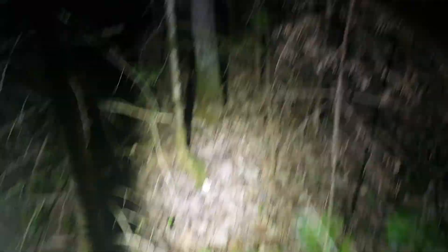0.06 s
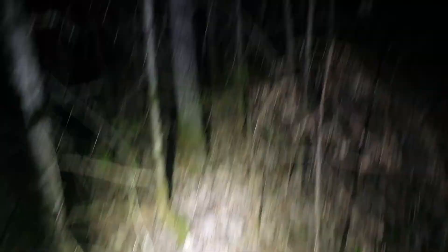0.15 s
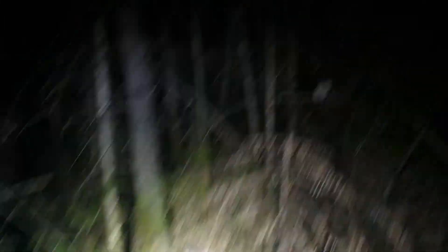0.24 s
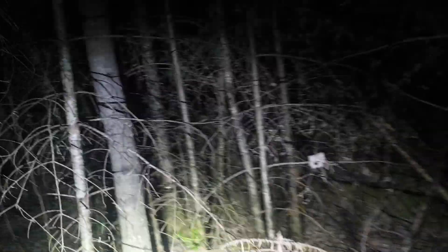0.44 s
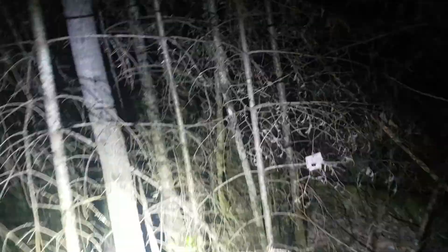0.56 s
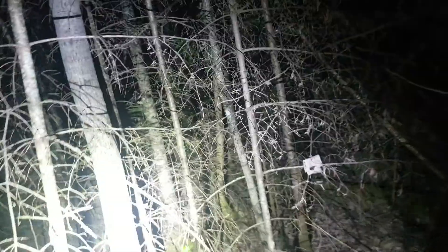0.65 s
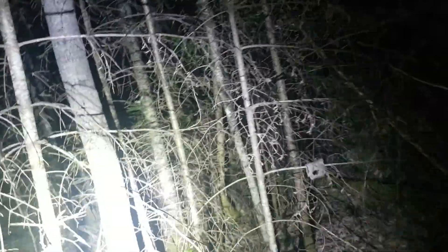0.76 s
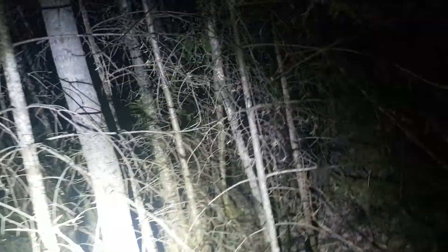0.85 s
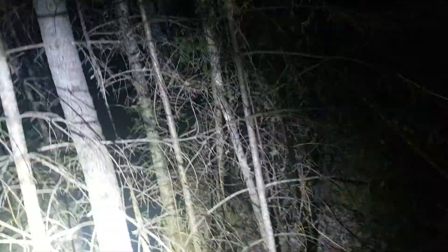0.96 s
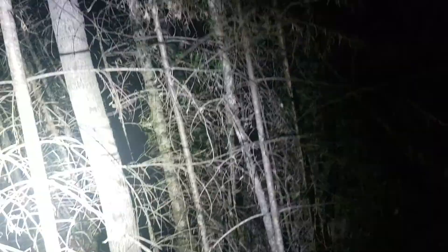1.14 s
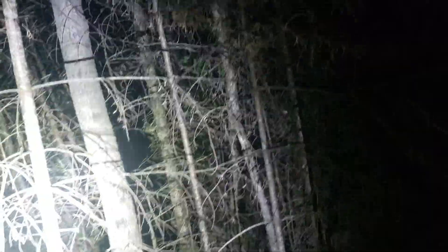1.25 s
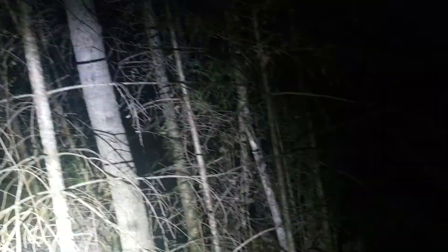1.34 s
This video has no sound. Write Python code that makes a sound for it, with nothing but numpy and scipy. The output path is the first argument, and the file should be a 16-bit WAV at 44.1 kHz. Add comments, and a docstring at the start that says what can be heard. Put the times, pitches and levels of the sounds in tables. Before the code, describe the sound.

A footstep crackles through dry leaves and brush, snapping small twigs in a quiet night forest.

```python
"""A step through dry leaves and brush on a forest floor, heard from a hand-held camera.
Still night air (coloured noise) and a low grip rumble run throughout, and leaves soon begin to crackle.
They swell twice, made of thousands of tiny clicks; single leaves tick, twigs snap and soil crunches.
The hand bumps the camera in low pulses; near 1.07 s a stick knocks twice, as decaying sine waves.
A sleeve then rubs in soft noise. The step is duller on the left and reaches the left a little later."""
import sys
import numpy as np
from scipy import signal
from scipy.fft import rfft, irfft
from scipy.io import wavfile
from scipy.ndimage import uniform_filter1d

SR = 44100
rng = np.random.default_rng(int(sys.argv[2]) if len(sys.argv) > 2 else 0)


def persist_wave(psi):
    """Save psi, clipped to +-1, as 16-bit WAV."""
    counts = np.round(np.clip(psi, -1, 1) * 32767).astype(np.int16)
    wavfile.write(sys.argv[1], SR, np.atleast_2d(counts).T)


N = 61739  # length in samples, about 1.4 s
LAG_S = 0.00012  # usual lateness at the left microphone


def undb(db):
    """Turn decibels into gain."""
    return 10 ** (np.asarray(db) / 20)


def unit(x):
    """Scale to an rms of one."""
    return x / np.sqrt(np.mean(x ** 2))


def curve(times, db):
    """Make a gain that follows straight lines, in decibels, between the given times."""
    return undb(np.interp(np.arange(N) / SR, times, db))


def colour(x, points):
    """Filter to a (pitch_hz, level_db) outline, without any sound arriving early (minimum phase)."""
    size = 4096
    hz, db = np.array(points).T
    f = np.maximum(np.fft.rfftfreq(size, 1 / SR), 1)
    outline_db = np.interp(np.log(f), np.log(hz), db)
    # Folding the cepstrum onto its first half makes the filter respond as early as it can.
    cepstrum = irfft(np.log(undb(outline_db)))
    cepstrum[1:size // 2] *= 2
    cepstrum[size // 2 + 1:] = 0
    response = irfft(np.exp(rfft(cepstrum)))
    return signal.fftconvolve(np.atleast_2d(x), response[None], axes=1)[:, :x.shape[-1]]


def even(x, size=21):
    """Level out the broad humps of a burst's spectrum, so that the wood alone gives the colour."""
    hz = np.fft.rfftfreq(len(x), 1 / SR)
    power = uniform_filter1d(np.abs(rfft(x)) ** 2, size=size) + 1e-12
    inverse = np.column_stack([hz, -10 * np.log10(power)])
    return colour(x, inverse[1:])[0]  # skip 0 Hz, which has no logarithm


def ports(x):
    """Give one sound to both microphones (left, right), the left a little late."""
    return np.array([np.roll(x, int(round(LAG_S * SR))), x])


# colour of the night air and microphone hiss: pitch_hz, level_db (relative)
AIR_COLOUR = [(25, -10.5), (80, 2.5), (130, -3), (300, -6), (1000, -19.5), (2000, -16), (3000, 2.5),
              (4000, -9.5), (5500, -3), (7500, -24.5), (12000, -11), (16000, -17)]


def air():
    """Night air and microphone hiss: steady coloured noise, separate at each microphone."""
    return undb(-68) * unit(colour(rng.standard_normal((2, N)), AIR_COLOUR))


# colour of the grip rumble: pitch_hz, level_db (relative)
GRIP_COLOUR = [(20, -14.5), (45, -7), (88, 0.5), (130, -15), (400, -55), (2000, -86)]
# loudness of the grip rumble on the left: start_s, level_db
GRIP_LEVEL_CURVE = [(0, -78.5), (.3, -79), (.52, -75.5), (.95, -80.5), (1.1, -69.5), (1.22, -67),
                    (1.3, -74.5), (1.4, -68)]


def grip(right_db=-7):
    """The hand's grip gives a low rumble, made of filtered noise and weaker on the right."""
    rumble = unit(colour(rng.standard_normal((2, N)), GRIP_COLOUR))
    return rumble * curve(*np.transpose(GRIP_LEVEL_CURVE)) * undb([[0], [right_db]])


def grains(per_s):
    """Tiny leaf fractures are clicks, each from its own direction and scattered by the litter."""
    spread_db = 4  # average rise of a click above the weakest, in dB
    lag_spread_s = 0.00018  # most that direction adds to or takes from the lag
    scatter_decay_s, scatter_db = 0.0031, -6.5
    count = int(per_s * N / SR)
    t = np.arange(N // 64) / SR
    scatter = rng.standard_normal(len(t)) * np.exp(-t / scatter_decay_s)
    scatter *= undb(scatter_db) / np.linalg.norm(scatter)
    when, strength, sign, side = rng.random((count, 4)).T
    # Most clicks are near the weakest size and few are strong; the sign is up or down at random.
    rise = -np.log(np.maximum(strength, np.exp(-4)))
    size = undb(spread_db * rise) * np.sign(sign - 0.5)
    at = (when * N).astype(int)
    late = np.round((LAG_S + lag_spread_s * (2 * side - 1)) * SR).astype(int)
    left = np.bincount((at + late) % N, size, N)
    right = np.bincount(at, size, N)
    pair = np.array([left, right])
    return unit(pair + signal.fftconvolve(pair, scatter[None], axes=1)[:, :N])


# rustle, then the leaves settling: start_s, body_db, crackle_db, treble_db (before the range boosts)
RUSTLE_LEVELS = [ [(0.0, -98, -71, -66), (0.054, -91, -82, -77.5), (0.106, -80, -65, -65.5),
                 (0.142, -78.5, -67, -71), (0.198, -65.5, -62, -60.5), (0.258, -72, -63, -61),
                 (0.308, -49.5, -49.5, -48), (0.332, -60.5, -49.5, -46.5), (0.396, -56, -51, -53),
                 (0.43, -62.5, -56.5, -53), (0.478, -58.5, -47.5, -47), (0.606, -52.5, -46, -43),
                 (0.66, -64, -55.5, -51)], ][0]
SETTLE_LEVELS = [(.70, -64.5, -59, -67), (.75, -66, -58, -59.5), (.80, -76, -61, -61.5),
                 (.835, -71.5, -59.5, -58), (.875, -74, -56, -55), (0.904, -60, -52, -55),
                 (.945, -64, -58.5, -60), (.985, -75.5, -64.5, -61.5), (1.05, -81, -71, -66),
                 (1.151, -84, -73.5, -69.5), (1.28, -105, -106, -71.5), (1.35, -102, -71, -66.5),
                 (1.4, -98, -75.5, -68)]
# colours of the three ranges of breaking leaf: pitch_hz, level_db (relative);
# the treble one also serves the twigs
BODY_COLOUR = [(40, -31), (150, -25), (260, -11), (400, -7), (650, 3), (1050, 8.5), (1500, 1.5),
               (2600, -41)]
CRACKLE_COLOUR = [(500, -49), (1000, -16), (1400, -2.5), (2000, 0), (2800, 4), (3400, 5), (4200, -1),
                  (5400, -1), (6800, -14.5), (10000, -30)]
TREBLE_COLOUR = [(4000, -43.5), (7000, -15), (8300, -9.5), (10000, -2), (12300, 3.5), (14000, -1),
                 (15500, 2.5), (17000, -8)]
# hollow sweep of the boot through the litter, in the first swell: pitch_hz, level_db (relative)
SWEEP_COLOUR = [(400, -25), (750, -4), (1000, -4.5), (1400, -3), (1950, 4.5), (2800, -2), (5000, -24.5)]
# loudness of that sweep: start_s, level_db
SWEEP_LEVEL_CURVE = [(.2, -64.5), (.25, -60.5), (.295, -46), (.335, -45), (.39, -50.5), (.44, -73)]


def leaves():
    """Fine and coarse leaf fractures swell as the foot brushes through and presses down, then die away."""
    fine_per_s, coarse_per_s, coarse_db = 9000, 500, -5
    times, body, crackle, treble = np.vstack([RUSTLE_LEVELS, SETTLE_LEVELS]).T
    fine = grains(fine_per_s)
    sweep = unit(colour(grains(fine_per_s), SWEEP_COLOUR))
    out = sweep * curve(*np.transpose(SWEEP_LEVEL_CURVE))
    ranges = (
        (BODY_COLOUR, body + 0.5),
        (CRACKLE_COLOUR, crackle + 5),
        (TREBLE_COLOUR, treble + 6),
    )
    for outline, level_db in ranges:
        fractures = fine + undb(coarse_db) * grains(coarse_per_s)
        out = out + unit(colour(fractures, outline)) * curve(times, level_db)
    return out


def woods(x):
    """Trunks return faint scattered echoes: the sound is smeared by fading, coloured noise."""
    t60_s, echo_db = 0.36, -15.5  # time to fade by 60 dB; level before colouring
    t = np.arange(N // 2) / SR
    echoes = rng.standard_normal((2, len(t))) * np.exp(-np.log(1000) * t / t60_s)
    echoes /= np.linalg.norm(echoes[0])
    echoes = colour(echoes, [(100, -8), (500, -7), (3000, -15), (8000, 2.5), (16000, -6)])
    return undb(echo_db) * signal.fftconvolve(x, echoes, axes=1)[:, :N]


# single leaves ticking: start_s, peak_db, pitch_hz
LEAF_TICKS = [(0.068, -46, 12200), (.169, -56, 12200), (.202, -51, 13000), (.467, -24, 3600),
              (.574, -26, 13000), (0.6756, -29, 14000), (0.772, -37.5, 11600), (.836, -35, 13000),
              (0.99, -39, 12100), (1.002, -45, 5600), (1.018, -47, 3000), (1.03, -48.5, 1530),
              (1.095, -47, 5200), (1.129, -43, 4850), (1.169, -38, 13000), (1.299, -49, 5400),
              (1.335, -46, 6000), (1.373, -46, 3280)]


def ticks():
    """Single leaves flick: short noise bursts, each through its own broad resonance."""
    decay_s, sharpness_q = 0.00075, 3.5
    t = np.arange(N) / SR
    out = np.zeros(N)
    for start, peak_db, hz in LEAF_TICKS:
        fade = (t > start) * np.exp(-np.abs(t - start) / decay_s)
        flick = rng.standard_normal(N) * fade + 1e-18
        tick = signal.lfilter(*signal.iirpeak(hz, sharpness_q, fs=SR), flick)
        out += undb(peak_db) * tick / np.abs(tick).max()
    return ports(out)


# twig snaps: start_s, base_db, body_db, crack_db, treble_db, splinter_decay_s, ring_hz, ring_db
# (the four part levels are relative to base_db, before the boost of each part)
TWIG_SNAPS = [(.1012, -40.5, -41, -25, -12.5, 0.00037, 1550, -24.5),
              (0.1866, -41, -24, -12, -17, .0007, 3020, -35),
              (0.216, -40.5, -33, -27, -6, 0.00071, 12300, -20),
              (0.3374, -31.5, -29, -19.5, -17.5, 0.0021, 1410, -20),
              (0.3614, -30, -37, -20, -14.5, 0.0021, 2800, -17.5),
              (.4827, -25.5, -39, -19, -19, 0.0018, 3580, -9.5),
              (0.6489, -29.5, -29, -15.5, -11, 0.00027, 4900, -22),
              (.677, -18, -23.5, -18, -16, 0.00091, 1570, -21),
              (0.6892, -27.5, -32, -17, -13, 0.0012, 3220, -26.5),
              (.7127, -32.5, -31, -17, -12, 0.00098, 2480, -20),
              (0.8151, -24, -51, -23.5, -14.5, 0.00063, 3060, -26),
              (0.8886, -17.5, -18, -17.5, -18.5, 0.00035, 2804, -16.5),
              (0.8945, -30, -24, -16, -8.5, 0.00069, 3560, -17),
              (.902, -34, -24, -16, -22, 0.0016, 1600, -18),
              (0.9245, -30.5, -32, -13.5, -9.5, 0.00093, 2350, -19),
              (0.9339, -33, -21.5, -12, -13, 0.00088, 1440, -15.5),
              (1.1283, -40, -30, -19, -12, 0.0021, 1650, -15.5)]
# colours of breaking wood, body and crack: pitch_hz, level_db (relative)
WOOD_BODY_COLOUR = [(40, -39), (120, -25), (250, -12), (420, -0.5), (700, 0.5), (1050, 3), (1500, -12),
                    (2600, -35)]
WOOD_CRACK_COLOUR = [(500, -37), (1000, -9), (1500, -2), (2000, -2), (2800, 1.5), (4200, -1.5),
                     (5400, -3.5), (7000, -17), (10000, -30)]


def twigs():
    """Each twig gives one sharp break, a moment of splintering, a brief ring and a short rattle in the litter."""
    splinter_db, ring_t120_s = -6, 0.006
    rattle_db, rattle_decay_s = -16, 0.0049
    scatter_db = -8  # splintering that reaches the left microphone by other paths
    size = 4096
    out = np.zeros((2, N + size))
    t = np.arange(size) / SR
    rattle = undb(rattle_db) * np.exp(-t / rattle_decay_s)
    ring_fade = np.exp(-2 * np.log(1000) * t / ring_t120_s)
    for start, base_db, body, crack, treble, decay, ring_hz, ring in TWIG_SNAPS:
        splinters, left, right = rng.standard_normal((3, size))
        splinter_fade = np.exp(-t / decay)
        burst = undb(splinter_db) * splinters * splinter_fade
        burst[0] += 2  # the sharp break
        near = ports(even(burst + rattle * right))
        scattered = even(burst + left * (rattle + undb(scatter_db) * splinter_fade))
        wide = np.array([ports(scattered)[0], near[1]])
        mode = ports(np.sin(2 * np.pi * ring_hz * t) * t * ring_fade)
        parts = (
            (colour(near, WOOD_BODY_COLOUR), body + 25.5),
            (colour(wide, WOOD_CRACK_COLOUR), crack + 27),
            (colour(wide, TREBLE_COLOUR), treble + 27.5),
            (mode, ring + 28),
        )
        at = int(start * SR)
        for part, part_db in parts:
            out[:, at:at + size] += part / np.linalg.norm(part[1]) * undb(base_db + part_db)
    return out[:, :N]


# colour of soft soil giving under the sole: pitch_hz, level_db (relative)
SOIL_COLOUR = [(40, -17), (90, -8), (170, -6), (260, -5), (350, 3), (500, 2), (800, -2), (1400, -25)]
# loudness of the soil: start_s, level_db
SOIL_LEVEL_CURVE = [(.2, -79), (.34, -83), (.43, -72.5), (.5, -64.5), (.57, -59), (.655, -72.5), (.70, -72),
                    (.76, -71.5), (.82, -82), (.89, -75), (.96, -71), (1.01, -101)]
# thuds of weight landing on the ground: start_s, level_db, decay_s
WEIGHT_THUDS = [(0.684, -58, 0.03), (.892, -78, .012)]
# colour of the thuds: pitch_hz, level_db (relative)
GROUND_COLOUR = [(30, -12), (80, -1), (200, -3.5), (300, -3), (700, -21.5)]


def ground():
    """Soil crunches dully under the sole and thuds under landing weight, both as low filtered noise."""
    t = np.arange(N) / SR
    weight = np.zeros(N)
    for start, level_db, decay in WEIGHT_THUDS:
        weight += undb(level_db) * (t > start) * np.exp(-np.abs(t - start) / decay)
    thud = unit(colour(ports(rng.standard_normal(N)), GROUND_COLOUR))
    thud = thud * uniform_filter1d(weight, size=128)  # soften the onset
    soil = unit(colour(ports(rng.standard_normal(N)), SOIL_COLOUR))
    return thud + soil * curve(*np.transpose(SOIL_LEVEL_CURVE))


# bumps of the hand on the camera: middle_s, spread_s, level_db (on the left), pitch_hz
HAND_BUMPS = [(0.347, 0.033, -56.5, 40.9), (0.432, 0.028, -64.5, 55.3), (0.501, 0.027, -68, 50.4),
              (1.064, 0.016, -58, 65.6), (1.114, 0.013, -46, 47), (1.167, 0.059, -63, 53),
              (1.344, .025, -57, 47)]


def bumps(right_db=-15):
    """The hand bumps the camera: low waves that swell and fade in a bell shape, mostly on the left."""
    out = np.zeros(N)
    for middle, spread, level_db, hz in HAND_BUMPS:
        t = np.arange(N) / SR - middle
        out += undb(level_db) * np.cos(2 * np.pi * hz * t) * np.exp(-(t / spread) ** 2)
    return out * undb([[0], [right_db]])


# knocks of the stick: start_s, level_db
STICK_KNOCKS = [(1.0685, -38.5), (1.0702, -36.5)]
# ringing tones of the stick: pitch_hz, level_db (relative to the knock), t60_s (time to fade by 60 dB)
STICK_TONES = [(597, -45, 0.007), (1050, -36, .008), (1810, 3.5, 0.011), (2200, 2.5, 0.014),
               (2850, -44, .006)]


def stick(left_db=-8, contact_s=0.00027):
    """A dry stick to the right knocks and bounces once; each contact sets off short fading tones."""
    out = np.zeros(N)
    for start, knock_db in STICK_KNOCKS:
        t = np.maximum(np.arange(N) / SR - start, 0)
        rise = 1 - np.exp(-t / contact_s)
        for hz, tone_db, t60 in STICK_TONES:
            fade = np.exp(-np.log(1000) * t / t60)
            out += undb(knock_db + tone_db) * np.sin(2 * np.pi * hz * t) * fade * rise
    return ports(out) * undb([[left_db], [0]])


# colour of the rubbing sleeve: pitch_hz, level_db (relative)
SLEEVE_COLOUR = [(80, -4), (220, -3.5), (330, 7), (550, -3), (900, -14.5), (2500, -48)]
# loudness of the sleeve: start_s, level_db
SLEEVE_LEVEL_CURVE = [(1.15, -104), (1.23, -76), (1.31, -79), (1.38, -69), (1.4, -76)]


def sleeve():
    """A sleeve rubs near the end: soft filtered noise, the same at both microphones."""
    rub = unit(colour(rng.standard_normal(N), SLEEVE_COLOUR))
    return rub * curve(*np.transpose(SLEEVE_LEVEL_CURVE))


# level of the step at the left microphone as the camera swings round to face it: start_s, level_db
FACING_CURVE = [(0, -7.5), (.22, -5), (.32, -1), (.5, 0.5), (.68, .5), (.9, 0), (1.0, -0.5), (1.4, -2.5)]
# colour of the left microphone against the right: pitch_hz, level_db
LEFT_COLOUR = [(60, 1), (380, 1), (700, -2.5), (1290, -3), (2380, -11), (4100, -2), (5800, -5),
               (8400, -18.5), (10500, -16.5), (12300, -14.5), (15000, -17.5)]


def scene():
    """Mix the step and its echoes over still night air, then add the handling of the camera."""
    step = leaves() + ticks() + twigs() + ground() + stick()
    left, right = step + woods(step)
    air_left, air_right = air()
    left = left * curve(*np.transpose(FACING_CURVE)) + undb(-1.5) * air_left
    left = colour(left, LEFT_COLOUR)[0]
    handling = grip() + bumps() + sleeve()
    return np.array([left, right + air_right]) + handling


def record(dry):
    """The recorder cuts the top: a steep low-pass filter at 15850 Hz."""
    top_cut = signal.ellip(10, 0.2, 80, 15850, fs=SR, output="sos")
    return signal.sosfilt(top_cut, dry)


dry = scene()
out = record(dry)
persist_wave(out)
```